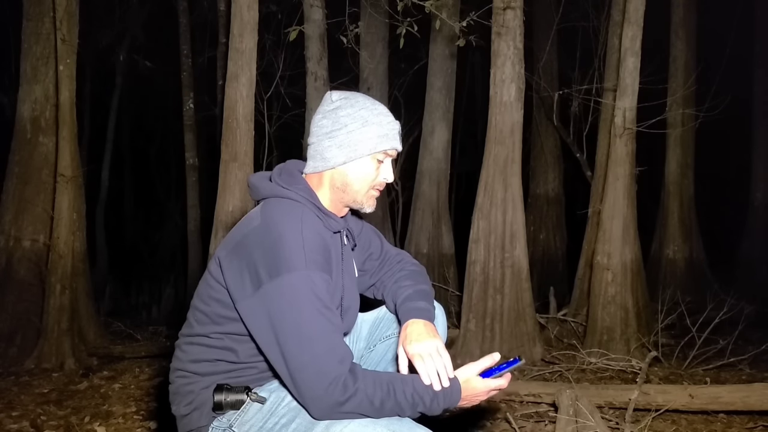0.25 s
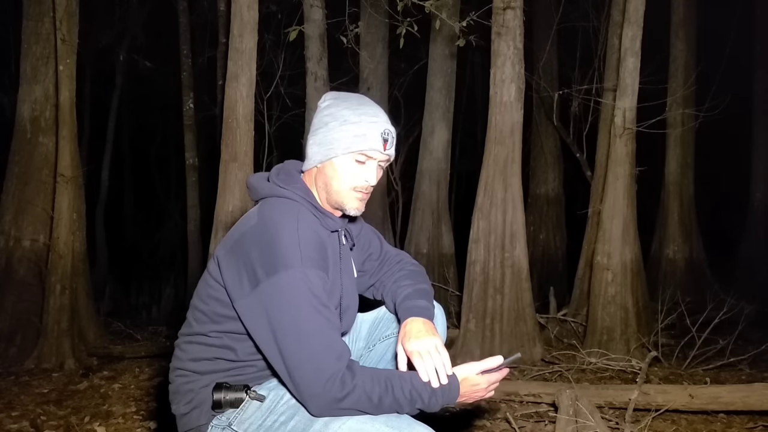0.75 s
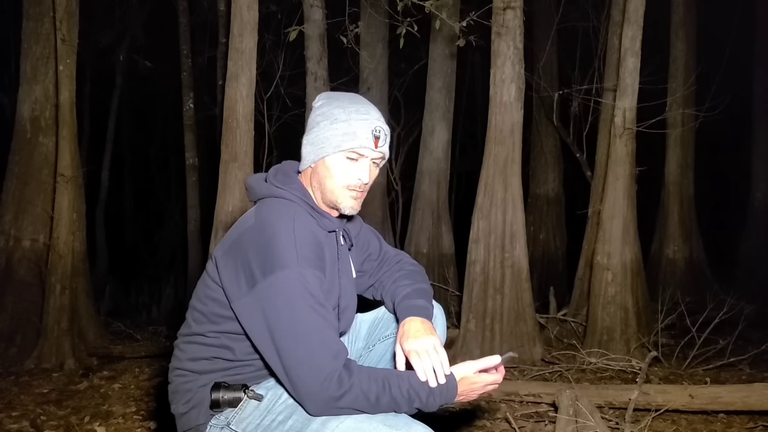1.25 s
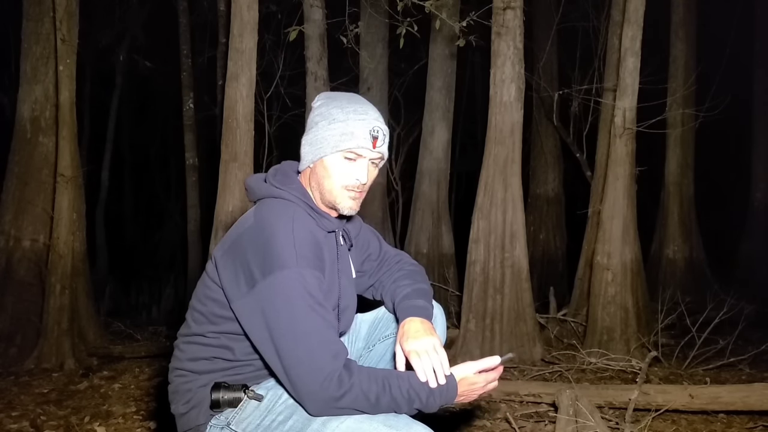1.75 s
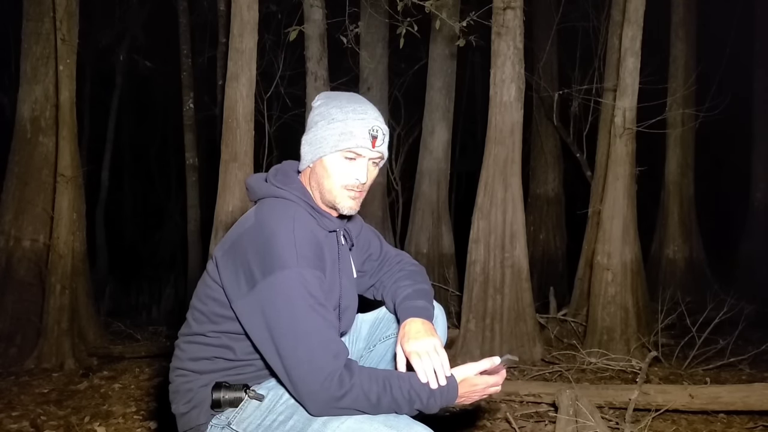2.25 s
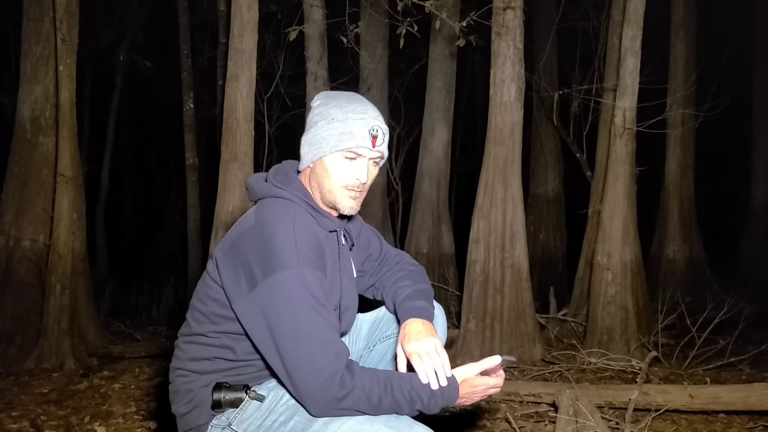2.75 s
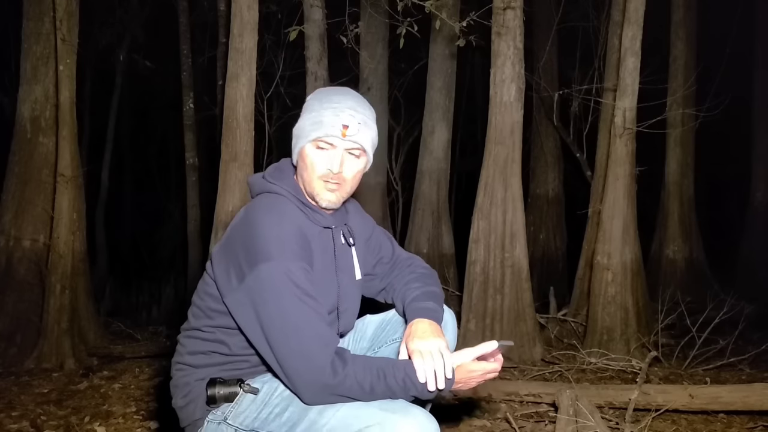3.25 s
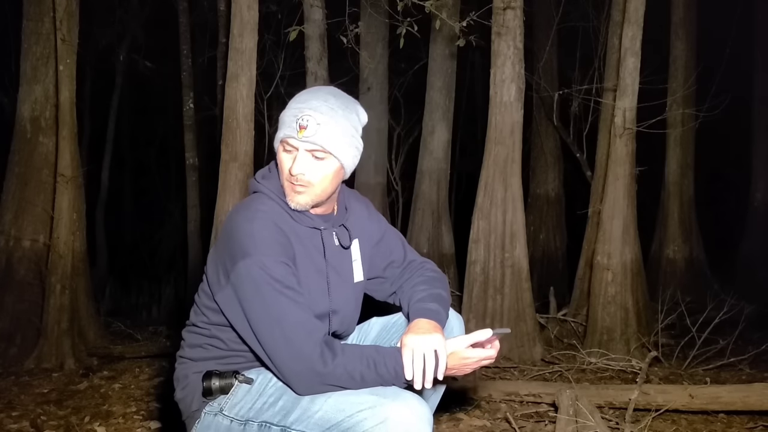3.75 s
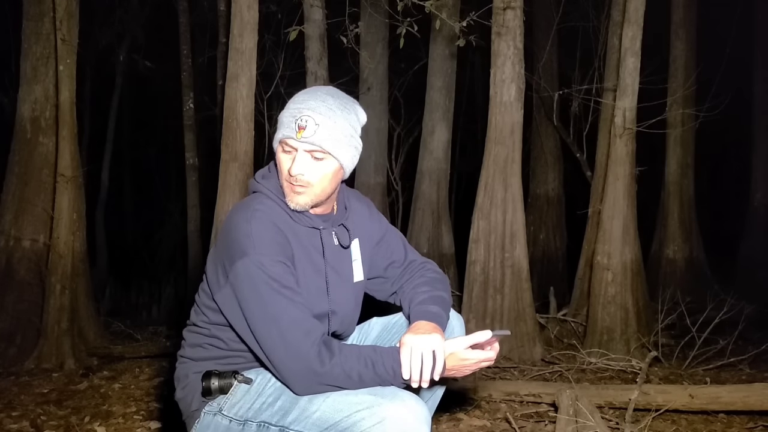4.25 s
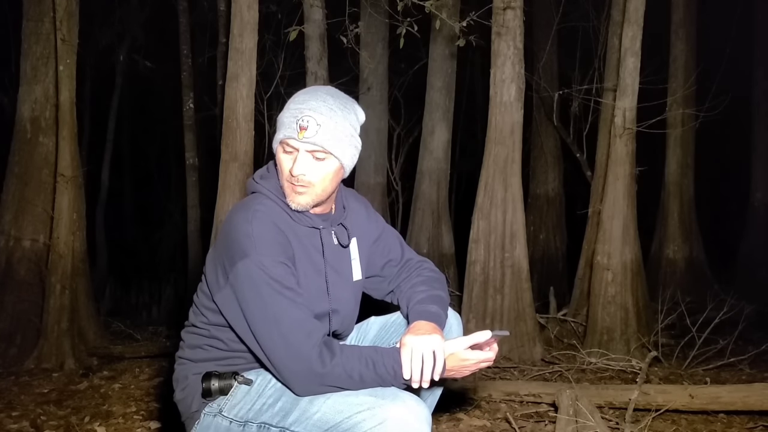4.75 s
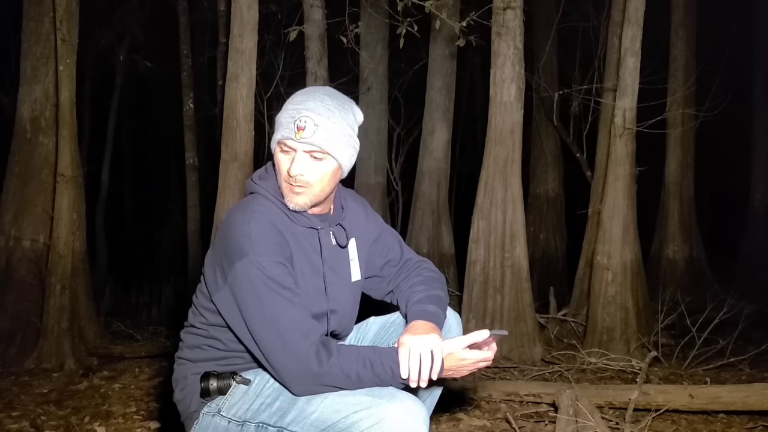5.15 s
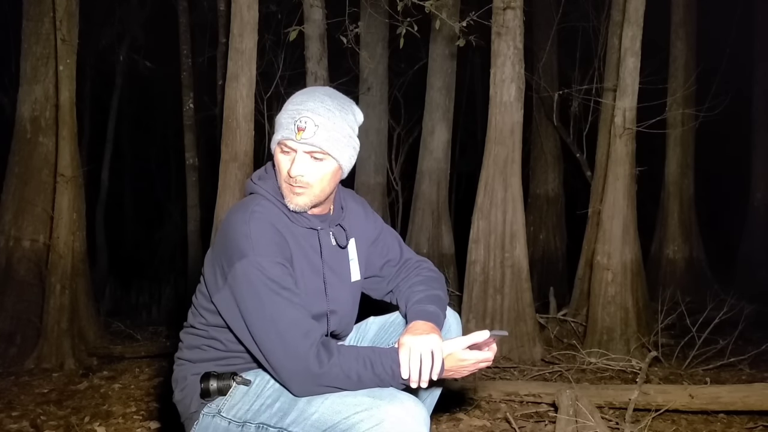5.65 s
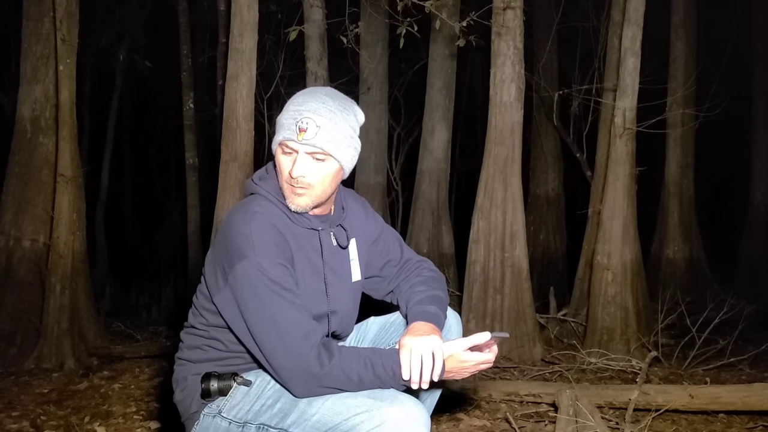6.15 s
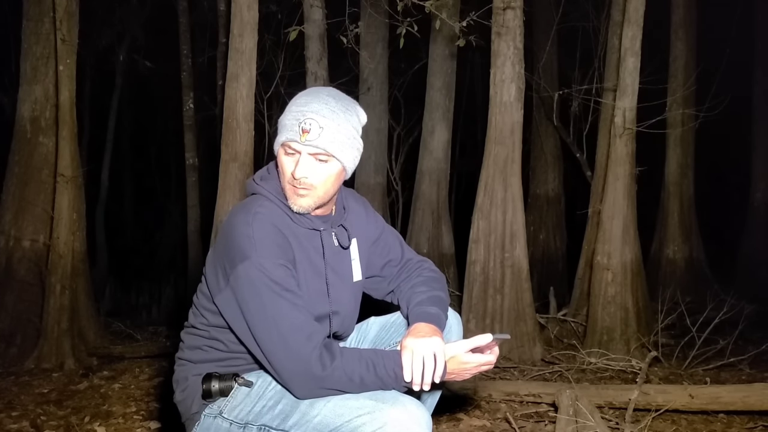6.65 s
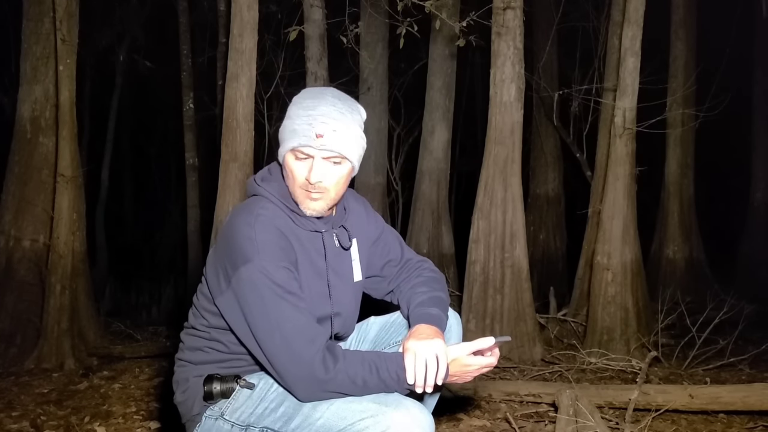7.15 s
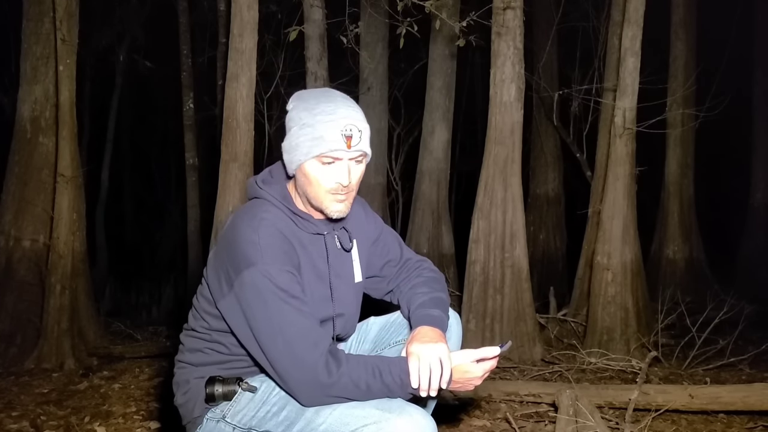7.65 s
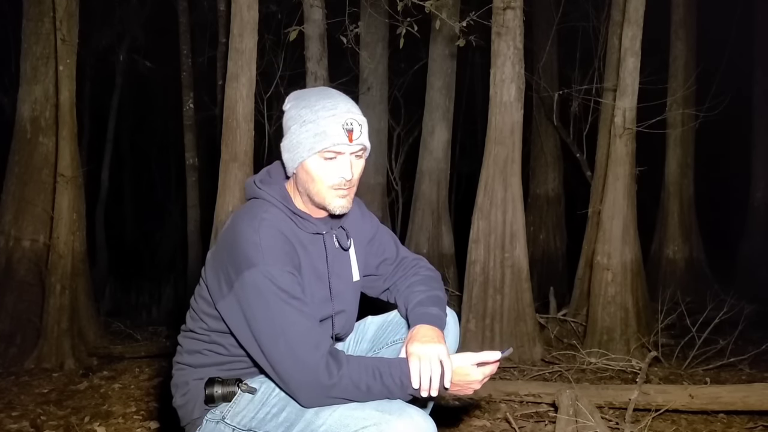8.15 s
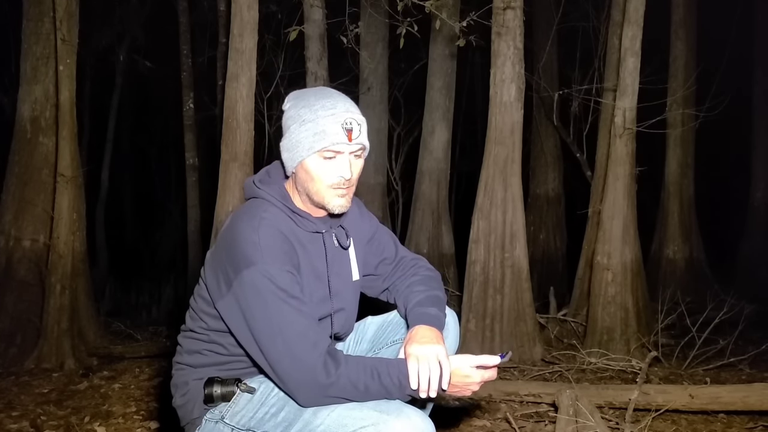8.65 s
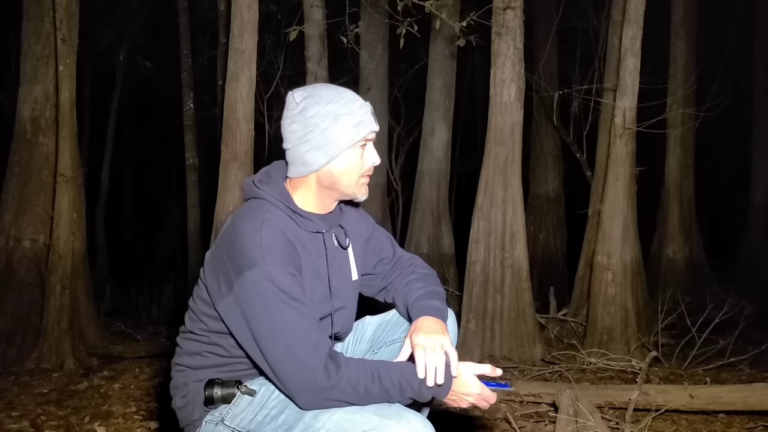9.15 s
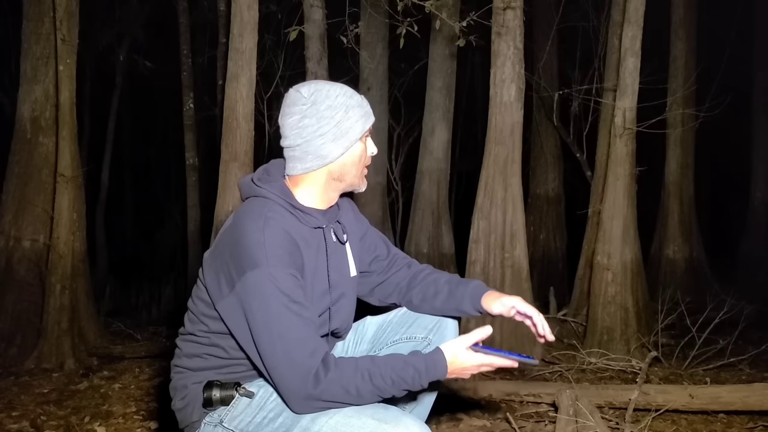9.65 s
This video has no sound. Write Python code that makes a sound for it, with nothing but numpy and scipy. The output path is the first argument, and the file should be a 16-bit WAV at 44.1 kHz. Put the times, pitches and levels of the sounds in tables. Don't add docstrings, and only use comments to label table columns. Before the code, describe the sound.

A quiet wooded swamp at night in stereo. Several frogs, mostly toward the left, give short croaking chuckles, rapid rows of hoarse knocks with an echoing woodland tail. Calls cluster in the first five seconds, thin to faint distant ones, then return near eight seconds. Small crickets trade brief high trills on both sides over fine insect hiss, a murmuring far frog chorus and a low road rumble.

```python
import sys
import numpy as np
from scipy import signal
from scipy.fft import rfft, irfft, next_fast_len
from scipy.io import wavfile
from scipy.ndimage import uniform_filter1d

SR = 44100
rng = np.random.default_rng(int(sys.argv[2]) if len(sys.argv) > 2 else 0)


def natural_amplitude(level_db):
    exponent = np.asarray(level_db, float) / 20
    return 10 ** exponent


def unload_wav(signal):
    wavfile.write(
        sys.argv[1],
        SR,
        np.round(np.clip(np.atleast_2d(signal).T, -1, 1) * 32767).astype(np.int16),
    )


N = 436570

# first knock t/s, loudest knock t/s, last knock t/s, peak level/dB,
# vocal sac f/Hz at the loudest knock
NEAR_CALLS = [
    (0.394, 0.8041, 0.89, -36.5, 1754),
    (1.379, 1.6357, 1.7975, -36, 1770),
    (8.8303, 9.1691, 9.2519, -35.5, 1784),
]
DEEP_CALLS = [
    (2.373, 2.691, 3.017, -37.5, 1739),
    (9.595, 9.878, 9.8789, -43.5, 1837),
]
MUD_CALLS = [
    (2.7775, 2.8523, 3.1779, -42.5, 1496),
    (3.605, 3.8414, 4.097, -41.5, 1456),
]
HIGH_CALLS = [
    (8.327, 8.551, 8.7008, -39.5, 2420),
    (8.9617, 9.2805, 9.35, -40, 2327),
]
HIDDEN_CALLS = [
    (2.7681, 3.0974, 3.22, -38.5, 2370),
    (3.6194, 3.8691, 4.1, -40.5, 2452),
    (4.4458, 4.7, 4.872, -40.5, 2474),
]
FAR_CALLS = [
    (5.11, 5.27, 6.8, -68, 1803),
    (6.558, 6.726, 7.46, -58, 2332),
    (7.076, 7.236, 7.32, -60, 1860),
    (7.4214, 7.4989, 7.66, -58.5, 2259),
    (8.2114, 8.2955, 8.9, -50.5, 2304),
]
# t/s, peak level/dB, vocal sac f/Hz, left-right level/dB, echo level/dB
EARLIER_KNOCKS = [
    (0.003, -44.5, 2048, 0, 0),
    (0.004, -51, 2327, 0, 0),
    (0.049, -62, 1800, 0, 0.0046),
]
# fold rate f/Hz, sac width f/Hz, throat f/Hz, throat level/dB, snap level/dB, hoarseness/0-1,
# direct level/dB, echo level/dB
VOICES = [
    (300, 282, 554, -12, -10.5, 0.24, 1, 1.5),
    (295.3, 263, 545, -8, -12.5, 0.38, 1, 2),
    (190.4, 380, 820, -6, -7.5, 0.25, 2.5, 0),
    (290, 263, 784, -6, -4.5, 0.38, -9.5, 4),
    (291, 260, 497, -15, -25, 0.66, -7, 5),
    (288, 180, 870, 1, -30, 0.68, -31, 3),
]
# swell level/dB, fade level/dB, flatness of the top/1, sac rise before the peak f/Hz,
# sac glide after it f/Hz per knock
HABITS = [
    (21, 4, 1.33, 290.5, 75.5),
    (20.5, 14.5, 0.95, 12, -5.5),
    (2, 12, 2, 40, -42),
    (9.5, 11.5, 1.4, -58, -1),
    (12, 6.5, 1.7, 70, -49.5),
    (7, 9, 1.4, 33, -54),
]
# left-right level/dB, echo gained per dB of softness/dB, sac wobble f/Hz
SEATS = [
    (2.5, 0.39, 21),
    (1.5, 0.25, 30),
    (-3, -0.02, 62),
    (7, 0.26, 67),
    (8, 0.04, 60),
    (.6, 0.6, 61),
]
KNOCK_GAP_S, KNOCK_WOBBLE_DB = 0.082, 1.3
TRUNKS_T60_S, FROG_LEAD_S = 1, 0.00045
BANK_ECHO_S, BANK_ECHO_DB = 0.063, -13

# wing f/Hz, stroke rate f/Hz, left-right level/dB, left lead/rad
CRICKETS = [
    (3674, 48.5, -2, 1.55),
    (3800, 46.2, 8.5, -2),
    (3866, 46.2, 9.5, -1.5),
    (3940, 47.8, -5.5, -2.3),
    (3960, 47.6, -4, 1.9),
    (3982, 44.7, -3.5, 2),
    (3910, 54, -3, 1.3),
    (4475, 39, 1, 0.5),
]
# t/s, length t/s, rms level/dB
LOW_TRILLS = [(2.442, .24, -59), (4.88, .23, -57), (7.815, .24, -58.5)]
SLOW_TRILLS = [(1.296, 0.22, -63.5), (2.871, .22, -61), (4.61, 0.22, -63.5), (6.556, 0.19, -61),
               (8.034, 0.22, -65.5)]
LEFT_TRILLS = [(.522, .21, -62.5), (2.531, .3, -61.5), (4.343, .24, -63), (5.703, .2, -73),
               (6.746, .21, -62), (8.93, .21, -61.5)]
RIGHT_TRILLS = [(.178, .17, -59), (1.253, .17, -60), (2.004, .16, -60), (4.782, .17, -62.5),
                (5.226, .18, -58.5), (7.63, .22, -67.5), (7.974, .16, -65), (8.324, .29, -59)]
QUICK_TRILLS = [(1.121, .13, -66), (1.797, .19, -65), (5.504, .18, -58), (6.072, .13, -68),
                (6.578, .19, -64)]
TOP_TRILLS = [(.386, 0.17, -60.5), (0.585, 0.23, -65), (3.188, 0.21, -60.5), (6.196, 0.19, -60.5),
              (7.141, 0.31, -66.5), (8.883, .18, -64), (9.496, 0.22, -72)]
FAR_TRILLS = [(.012, .12, -76), (.853, .2, -72), (3.075, .14, -61), (3.615, .35, -77), (4.1, .2, -72),
              (6.952, .15, -73), (9.129, .18, -73), (9.793, .12, -63)]
SMALL_TRILLS = [(.15, .2, -78), (1.8, .2, -76), (8.52, .2, -77)]
CHORUS_HZ, CHORUS_WIDTH_HZ, CHORUS_DB = 3888, 104, -74.5
# t/s, level/dB
LONG_TRILL = [(0.0, -95), (0.4, -79), (1.2, -75.5), (2.1, -80), (2.699, -100), (9.9, -110)]
LONG_TRILL_HZ = 4945
# f/Hz, width f/Hz, level/dB
KATYDID = [(10100, 150, -92.5), (10400, 110, -91), (10870, 90, -95), (11000, 150, -92)]

# t/s, level/dB
POND_SWELLS = [(0.0, -59.5), (0.499, -61.5), (1.5, -60.5), (2.1, -63.5), (3.1, -61), (3.7, -61),
               (4.5, -62.5), (5.75, -61.5), (5.95, -73.5), (7.1, -70.5), (8.0, -70), (8.4, -59), (9.9, -59)]
# t/s, road level/dB, drone f/Hz, drone level/dB, woods level/dB
AIR = [(0.0, -49, 63.1, -72, -63.5), (0.47, -47, 80.6, -46, -63.5), (1.16, -48.5, 57.7, -64, -63),
       (1.41, -47.5, 77.4, -63, -63.5), (3.2, -48, 57.7, -49.5, -63.5), (3.64, -47.5, 76.97, -54, -62.5),
       (9.9, -48, 71.04, -45.5, -63)]
# f/Hz, level/dB per Hz
POND = [(700, -29), (1100, -6.5), (1500, -3.5), (1900, -0.5), (2300, -10.5), (2700, -22), (3300, -42)]
WOODS = [(150, -22), (250, -5), (405, -3.5), (518, 0), (638, -3), (796, -2.5), (967, -11.5), (1490, -14.5),
         (2400, -16), (3650, -14), (3940, -9.5), (4260, -20), (4730, -19), (5600, -29.5), (7280, -63),
         (12300, -120)]
HISS = [(2710, -45), (4600, 1), (5010, -6), (5510, -15.5), (6680, -9), (7170, -14.5), (7690, -10.5),
        (8210, -15.5), (8990, -7), (10500, -8), (14700, -9.5), (15300, -12)]
ROAD = [(11, -41), (18, -17.5), (52, -1), (75, 0.5), (128, -8), (156, -14.5), (217, -16.5), (279, -31.5),
        (420, -29), (550, -81), (920, -120)]
HISS_DB = -70.5
# f/Hz, likeness/0-1
LIKENESS = [(60, 0.95), (180, 0.91), (540, 0.2), (1640, 0), (4940, 0.08), (14900, 0)]
# f/Hz, level/dB
TILT = [(60, -1.5), (95, -1), (150, -1.5), (240, -0.5), (380, -1.5), (600, -1.5), (940, -2), (1500, -2.5),
        (2370, 3), (3750, 4.5), (5940, 5), (9400, -0.5), (14900, 3.5)]
CUTOFF_HZ = 15490


def at_hz(points, hz):
    table = np.array(points)
    return np.interp(np.log(hz), np.log(table[:, 0]), table[:, 1])


def course(s, values):
    return np.interp(np.arange(N) / SR, s, values)


def rms_one(x):
    return x / np.sqrt(np.mean(x ** 2) + 1e-20)


def drift(rate_hz):
    step = 40
    r = np.exp(-2 * np.pi * rate_hz * step / SR)
    chance = rng.standard_normal(N // step + 4002)
    slow = signal.lfilter([1], [1, -2 * r, r * r], chance)[4000:]
    return np.interp(np.arange(N) / step, np.arange(len(slow)), rms_one(slow))


def sides(pan_db):
    return natural_amplitude(np.array([[.5], [-.5]]) * pan_db)


def add(out, s, sound):
    i = int(round(s * SR))
    out[..., i:i + sound.shape[-1]] += sound[..., :max(N - i, 0)]


def narrow_band(x, hz, width_hz):
    edges = [hz - width_hz / 2, hz + width_hz / 2]
    return rms_one(signal.sosfilt(signal.butter(2, edges, "band", fs=SR, output="sos"), x))


def coloured(spectrum):
    size = next_fast_len(N)
    hz = np.maximum(np.arange(size // 2 + 1) * SR / size, 1)
    mid, side = rfft(rng.standard_normal((2, size)))
    alike = np.clip(at_hz(LIKENESS, hz), 0, 1)
    pair = np.sqrt(1 + alike) * mid + np.sqrt(1 - alike) * side * [[1], [-1]]
    gain = (hz < CUTOFF_HZ) * natural_amplitude(at_hz(spectrum, hz)) * sides(at_hz(TILT, hz))
    return rms_one(irfft(pair * gain, size)[:, :N])


def trunks(x, t60, first_s=0.0029):
    t = np.arange(SR) / SR
    decay = natural_amplitude(-60 * t / t60) + 0.77 * natural_amplitude(-240 * t / t60)
    swarm = rng.standard_normal((2, SR)) * decay * np.clip(t / first_s - 1, 0, 1)
    swarm = swarm / np.sqrt(np.sum(swarm ** 2, axis=1, keepdims=True))
    return signal.fftconvolve(x[None], swarm, axes=1)[:, :N]


def call_knocks(calls, habit, seat):
    swell_db, fade_db, flatness, higher_hz, glide_hz = habit
    pan_db, echo_share, wobble_hz = seat
    rows = []
    wobbles = rng.standard_normal((len(calls), 24, 2))
    for (first, loudest, last, peak_db, sac_hz), wobble in zip(calls, wobbles):
        before = round((loudest - first) / KNOCK_GAP_S)
        after = round((last - loudest) / KNOCK_GAP_S)
        for k in range(-before, after + 1):
            rising = k < 0
            share = -k / before if rising else k / max(after, 1)
            s = loudest + share * ((first if rising else last) - loudest)
            soft_db = (swell_db if rising else fade_db) * share ** flatness
            level_wobble, hz_wobble = wobble[k] * (k != 0)
            level_db = peak_db - soft_db + KNOCK_WOBBLE_DB * level_wobble
            hz = sac_hz + (higher_hz if rising else glide_hz * k) + wobble_hz * hz_wobble
            rows.append((s, level_db, hz, pan_db, echo_share * soft_db))
    return rows


def frog(knocks, voice, knock_s=0.0062, snap_s=0.0057, narrowing=0.42):
    fold_hz, width_hz, throat_hz, throat_db, snap_db, hoarse, direct_db, echo_db = voice
    t = np.arange(1600) / SR
    shape = t / knock_s * np.exp(1 - t / knock_s) * np.clip(3.5 - t / 0.0069, 0, 1)
    snap_shape = t / snap_s * np.exp(1 - t / snap_s) / 2
    order = np.arange(1, 17)[:, None]
    broad = signal.butter(3, [600, 2100], "band", fs=SR, output="sos")
    direct, snaps, send = np.zeros((2, N)), np.zeros((2, N)), np.zeros(N)
    for s, level_db, sac_hz, pan_db, tail_db in knocks:
        start = s - .002
        chance, breath = rng.standard_normal((2, 16, 1)), rng.standard_normal((17, 1600))
        hz = order * sac_hz / np.round(sac_hz / fold_hz)
        sac = np.exp(-((hz - sac_hz) / width_hz) ** 2)
        throat = natural_amplitude(throat_db) * np.exp(-((hz - throat_hz) / 200) ** 2)
        gain = sac + throat
        flutter = 4.4 * np.clip(hoarse, 0, 1) * uniform_filter1d(breath[1:], size=120, axis=1) * 4
        cycles = hz * (1.02 * t - 1.39 * t ** 2)
        waves = np.sin(2 * np.pi * cycles + 1.77 * chance[1] + flutter)
        partials = shape * gain * natural_amplitude(2 * chance[0]) * waves
        partials = natural_amplitude(level_db) * partials / np.abs(partials.sum(axis=0)).max()
        knock = partials.sum(axis=0)
        carrying = np.sum(partials * np.minimum(gain * 0.93, 1) ** narrowing, axis=0)
        snap = natural_amplitude(level_db + snap_db) * rms_one(signal.sosfilt(broad, breath[0])) * snap_shape
        add(direct, start, knock * sides(pan_db))
        add(snaps, start, snap * sides(0))
        add(send, start, natural_amplitude(tail_db) * (carrying + 0.42 * snap))
        add(direct, s + BANK_ECHO_S, natural_amplitude(BANK_ECHO_DB + tail_db) * carrying * sides(pan_db))
    direct = natural_amplitude(direct_db) * direct + snaps
    late = np.interp(np.arange(N) - FROG_LEAD_S * SR, np.arange(N), direct[1])
    return np.array([direct[0], late]) + natural_amplitude(echo_db) * trunks(send, TRUNKS_T60_S)


def frogs():
    calls = [NEAR_CALLS, DEEP_CALLS, MUD_CALLS, HIGH_CALLS, HIDDEN_CALLS, FAR_CALLS]
    near, deep, mud, *others = map(call_knocks, calls, HABITS, SEATS)
    voiced = sum(map(frog, [near, deep + mud, *others, EARLIER_KNOCKS], VOICES))
    return signal.sosfilt(signal.butter(6, 3600, fs=SR, output="sos"), voiced)


def crickets(warm_up_hz=140, sweep_hz=180, duty=.8, echo_db=-6):
    direct, send = np.zeros((2, N)), np.zeros(N)
    songs = [LOW_TRILLS, SLOW_TRILLS, LEFT_TRILLS, RIGHT_TRILLS,
             QUICK_TRILLS, TOP_TRILLS, FAR_TRILLS, SMALL_TRILLS]
    trills = [(*trill, *cricket) for song, cricket in zip(songs, CRICKETS) for trill in song]
    chances = rng.standard_normal((60, 2, 20))
    for (s, length, level_db, hz, rate, pan_db, lead), uneven in zip(trills, chances):
        t = np.arange(int(round(length * rate + .5) / rate * SR)) / SR
        stroke = np.clip(t * rate % 1 / duty, 0, 1)
        count = (t * rate).astype(int)
        sweep = .13 * sweep_hz - sweep_hz * np.exp(-stroke / .16)
        pitch = hz + sweep - warm_up_hz * (count == 0) + 8 * uneven[0, count]
        wing = 2 * np.pi * np.cumsum(pitch) / SR
        envelope = np.sin(np.pi * stroke) ** 0.63 * np.minimum(1, 0.19 + t / 0.076)
        loud = natural_amplitude(level_db + 5.0 + 2.4 * uneven[1, count]) * envelope
        start = max(s - (1 + duty / 2) / rate, 0)
        add(direct, start, loud * np.sin(wing + np.array([[lead], [0]])) * sides(pan_db))
        add(send, start, loud * np.sin(wing))
    return direct + natural_amplitude(echo_db) * trunks(send, 0.43)


def cricket_chorus():
    band = narrow_band(rng.standard_normal((2, N)), CHORUS_HZ, CHORUS_WIDTH_HZ)
    return natural_amplitude(CHORUS_DB + 2.0 * drift(1.8)) * band


def ground_cricket():
    blur = narrow_band(rng.standard_normal((2, N)), LONG_TRILL_HZ, 140)
    return natural_amplitude(course(*np.transpose(LONG_TRILL))) * blur * sides(2.7)


def katydid():
    rasp = rng.standard_normal(N) * natural_amplitude(1.2 * drift(6.9))
    modes = [natural_amplitude(db) * narrow_band(rasp, hz, width_hz) for hz, width_hz, db in KATYDID]
    return sum(modes) * sides(-15.0)


def pond():
    level_db = course(*np.transpose(POND_SWELLS))
    return natural_amplitude(level_db - 3.0 + 1.8 * drift(9.1)) * coloured(POND)


def woods(level_db):
    return natural_amplitude(level_db + 3.0 + 1.0 * drift(5.1)) * coloured(WOODS)


def insect_hiss():
    return natural_amplitude(HISS_DB + 0.6 * drift(19.0)) * coloured(HISS)


def road(level_db, drone_hz, drone_db):
    phase = 2 * np.pi * np.cumsum(drone_hz + 2.93 * drift(3.66)) / SR
    drone = np.sin(phase) * natural_amplitude(drone_db + 4.0 * drift(3.0))
    return natural_amplitude(level_db + 0.5) * coloured(ROAD) + drone * sides(-1.9)


def scene():
    s, *columns = np.transpose(AIR)
    road_db, drone_hz, drone_db, woods_db = [course(s, column) for column in columns]
    insects = crickets() + cricket_chorus() + ground_cricket() + katydid() + insect_hiss()
    return frogs() + insects + pond() + woods(woods_db) + road(road_db, drone_hz, drone_db)


def low_pass(x):
    return signal.sosfilt(signal.butter(12, 15480, fs=SR, output="sos"), x)


def record(dry):
    return low_pass(dry)


dry = scene()
out = record(dry)
unload_wav(out)
```